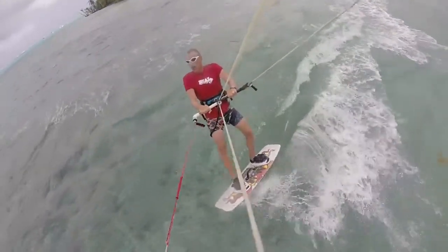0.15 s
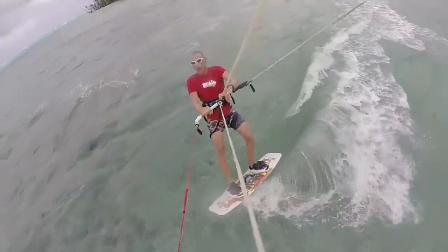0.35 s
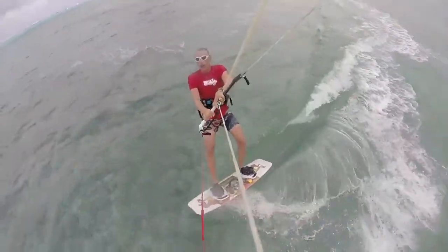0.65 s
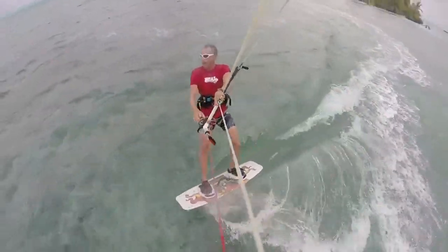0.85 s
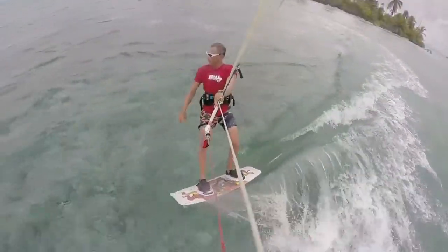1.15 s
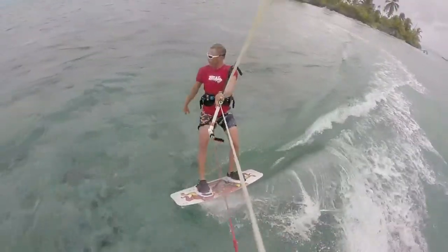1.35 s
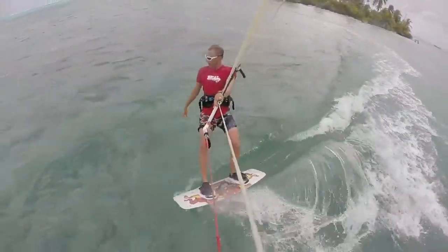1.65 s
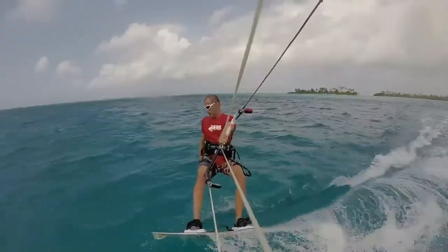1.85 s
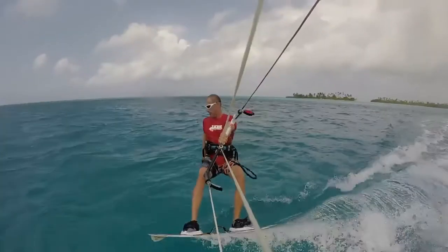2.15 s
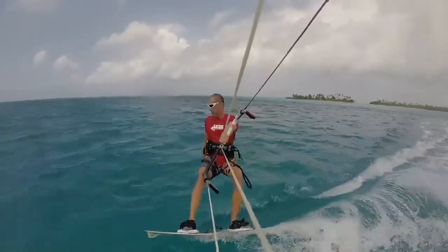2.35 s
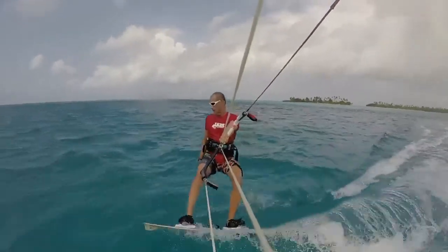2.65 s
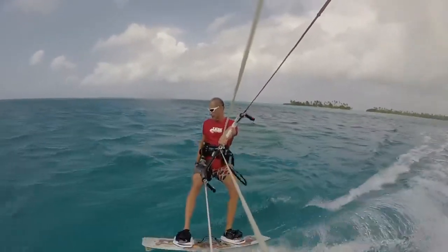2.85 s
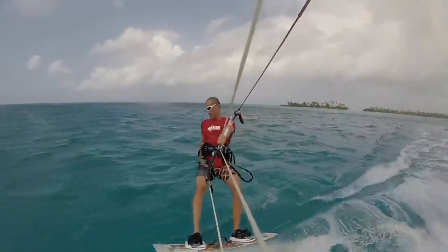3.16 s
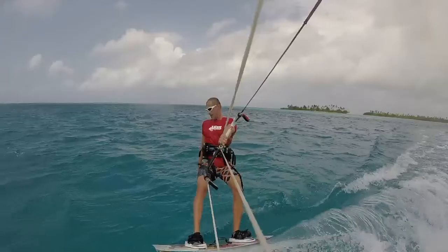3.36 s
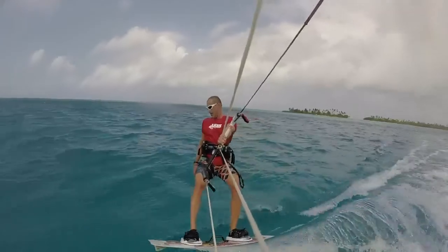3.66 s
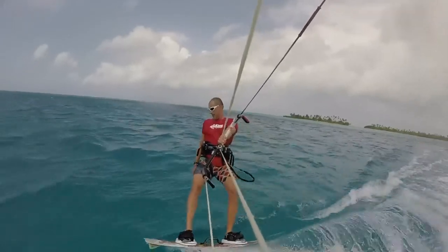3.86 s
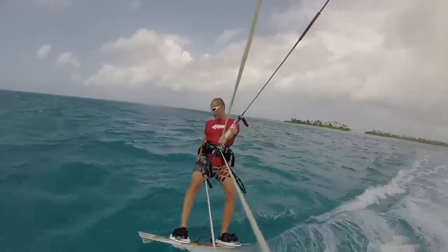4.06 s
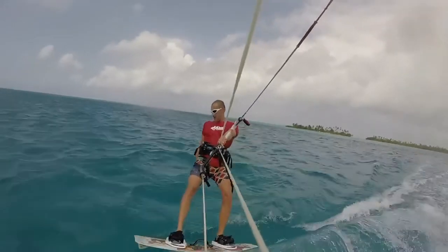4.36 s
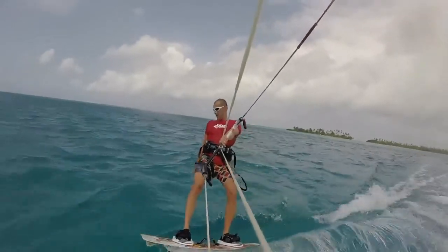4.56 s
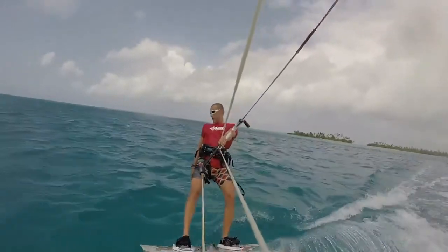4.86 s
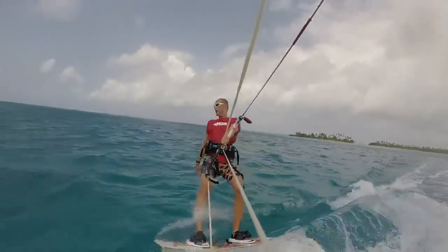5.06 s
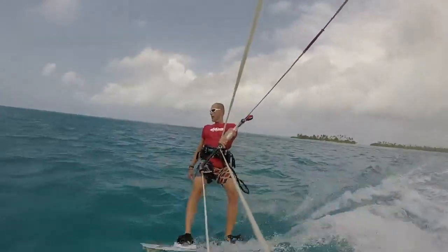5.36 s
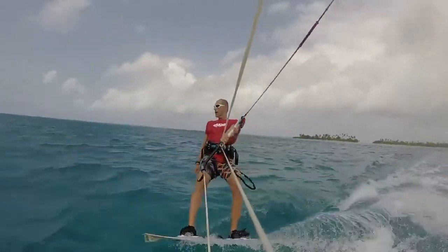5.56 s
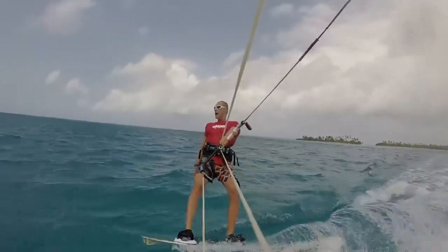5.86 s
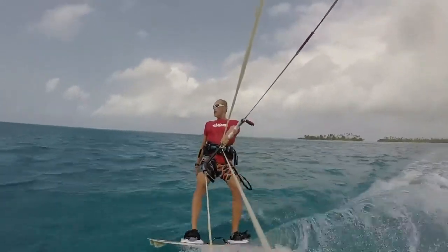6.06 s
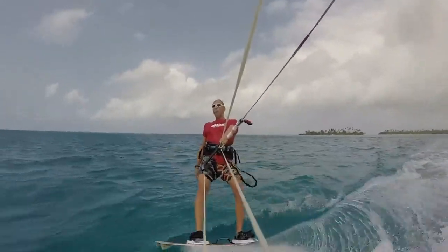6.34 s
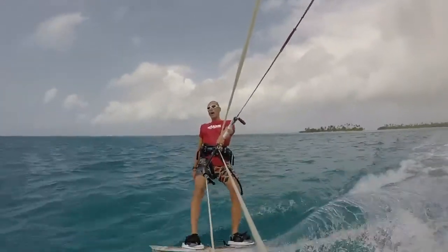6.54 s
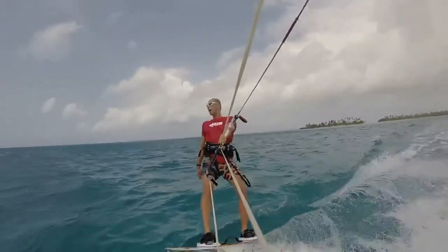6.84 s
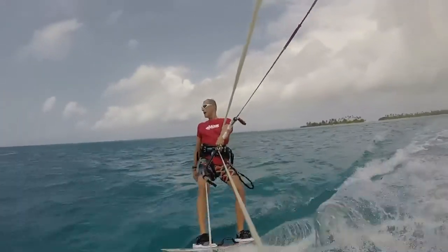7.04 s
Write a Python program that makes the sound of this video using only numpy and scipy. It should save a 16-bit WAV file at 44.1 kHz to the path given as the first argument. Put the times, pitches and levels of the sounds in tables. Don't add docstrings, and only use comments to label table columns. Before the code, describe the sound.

A small camera hanging on kite lines above a rider at sea. Low gusts thud and shudder against its housing while a soft, hollow whistle rises slowly. After under two seconds the scene cuts abruptly to a much louder, higher, fluttering whistle with a thinner one an octave above. Board spray hisses below, and a few water drops tick on the housing.

```python
import sys
import numpy as np
from scipy import signal
from scipy.fft import rfft, irfft
from scipy.io import wavfile
from scipy.ndimage import uniform_filter1d, minimum_filter1d

SR = 44100
rng = np.random.default_rng(int(sys.argv[2]) if len(sys.argv) > 2 else 0)


def volts_from_db(level):
    exponent = np.asarray(level, float) / 20
    return 10 ** exponent


def unload_audio(sound):
    columns = np.transpose(np.atleast_2d(sound))
    steps = np.round(np.clip(columns, -1, 1) * 32767)
    wavfile.write(sys.argv[1], SR, steps.astype(np.int16))


N = 317520


def in_time(rows):
    s, *columns = np.transpose(rows)
    return [np.interp(np.arange(N) / SR, s, c) for c in columns]


def swells(rows):
    t = np.arange(0, N + 40, 40) / SR
    bells = sum(height * np.exp(-((t - s) / half) ** 2) for s, half, height in rows)
    return np.interp(np.arange(N) / SR, t, bells)


def drift(rate):
    r = np.exp(-80 * np.pi * rate / SR)
    draws = rng.standard_normal(N // 40 + 2002)
    slow = signal.lfilter([1], [1, -2 * r, r * r], draws)[2000:]
    return np.interp(np.arange(N) / 40, np.arange(len(slow)), rms_one(slow))


def wander(half_width_hz, order):
    low_pass = signal.butter(order, half_width_hz, fs=SR / 10, output="sos")
    draws = rng.standard_normal((2, N // 10 + 2))
    slow = rms_one(signal.sosfilt(low_pass, draws[0] + 1j * draws[1]))
    return np.interp(np.arange(N) / 10, np.arange(N // 10 + 2), slow)


def rms_one(x):
    return x / np.sqrt(np.mean(np.abs(x) ** 2) + 1e-20)


def colour(x, spectrum, resonances=()):
    hz = np.maximum(np.fft.rfftfreq(N, 1 / SR), 1)
    points = np.array(spectrum)
    shape_db = np.interp(np.log(hz), np.log(points[:, 0]), points[:, 1])
    for centre_hz, width_hz, top_db in resonances:
        shape_db += top_db * np.exp(-(2 * (hz - centre_hz) / width_hz) ** 2)
    return rms_one(irfft(rfft(x) * volts_from_db(shape_db), N))


def patchy_noise(edges_hz, shared_db, own_db, rate):
    bins, together, out = rfft(rng.standard_normal(N)), drift(rate), 0
    hz = np.fft.rfftfreq(N, 1 / SR)
    for low, high in zip(edges_hz, edges_hz[1:]):
        band = irfft(bins * (hz >= low) * (hz < high), N)
        out = out + band * volts_from_db(shared_db * together + own_db * drift(2 * rate))
    return out


def whistle(centre_hz, stretches, spread, follow, waver, flicker_db):
    out = 0
    reach_hz = follow * centre_hz + (1 - follow) * np.min(centre_hz) * 1.1
    for multiple, half_width, level_db in stretches:
        hz = centre_hz + spread * (multiple - 1) * (centre_hz if multiple < 1 else reach_hz)
        turns = np.cumsum(hz * (1 + waver * drift(5.0))) / SR
        envelope = wander(spread * half_width * np.mean(centre_hz), order=3)
        tone = np.real(envelope * np.exp(2j * np.pi * turns))
        out = out + volts_from_db(level_db + flicker_db * drift(6.1)) * tone
    return rms_one(out)


def whistling_lines(wind, lift_stretches, drag, lift_spread, drag_spread, follow):
    # t/s, half length/s, share of speed
    puffs = [(.6, 0.047, -0.018), (1.0, 0.046, 0.022), (1.2, .05, -.04), (1.33, 0.038, 0.028),
             (2.44, 0.041, -0.063), (2.55, 0.033, 0.021), (2.7, 0.09, -0.026), (3.25, 0.045, 0.015),
             (3.93, 0.048, 0.054), (4.13, 0.059, 0.028), (4.33, 0.053, -0.042), (4.9, 0.07, -0.03),
             (5.07, 0.041, 0.028), (5.3, 0.0591, -.033), (5.52, .06, 0.036), (5.71, 0.047, 0.014),
             (5.92, 0.082, -0.047), (7.0, 0.062, -0.035)]
    # multiple of the centre f, half width as share, level/dB
    drag_stretches = [(.93, 0.023, -7), (.98, 0.024, 0), (1.03, 0.018, -0.5), (1.075, 0.034, -9.5),
                      (1.02, 0.14, -7)]
    lift_hz, drag_hz, lift_db = in_time(wind)
    puff = swells(puffs)
    puff_db = 35 * puff
    base_db, db_per_octave, lift_share = drag
    drag_db = base_db + db_per_octave * np.log2(drag_hz / 1800) + puff_db
    drag_db += lift_share * (lift_db - np.mean(lift_db))
    lift_db = lift_db + puff_db
    lift = whistle(lift_hz * (1 + 1.1 * puff), lift_stretches, lift_spread, follow, waver=.007, flicker_db=1.5)
    thin = whistle(drag_hz * (1 + puff), drag_stretches, drag_spread, 0, waver=.012, flicker_db=3.5)
    return volts_from_db(lift_db) * lift + volts_from_db(drag_db - 3.5) * thin, lift_db


def gust_strength():
    # t/s, level/dB
    gusts = [(0.251, 2.5), (0.881, 6), (1.0, -3.5), (1.25, 1), (1.85, 2.5), (2.1, 2), (2.34, 6), (2.6, 5),
             (2.78, 4), (2.97, 6.5), (3.14, 7.5), (3.4, 3), (3.53, -1.5), (3.73, 0), (3.83, 0.5),
             (4.43, -1), (4.55, 5.5), (5.07, 5), (5.22, -3), (5.609, 3), (5.81, 2), (6.01, -3.5),
             (6.11, 8.5), (6.31, 3.5), (6.5, 1.5), (6.7, -1.5), (6.9, -1.5), (7.1, -3), (4.7, 3.5),
             (.72, -3.5)]
    return swells([(s, 0.09, db) for s, db in gusts])


def buffeting(gust_db):
    # f/Hz, level/dB
    buffet_colour = [(20, -2), (40, -8.5), (60, -1.5), (80, -2.5), (110, -0.5), (140, -6.5), (170, -13.5),
                     (230, -39)]
    rumble = patchy_noise([10, 50, 100, 300], shared_db=1.0, own_db=0.5, rate=46.0)
    return volts_from_db(-28 + gust_db) * colour(rumble, buffet_colour)


def air_rush(gust_db, lift_db, rush_colour, rush_db):
    # t/s, half length/s, level/dB
    eddies = [(.2, 0.068, -2), (.7, 0.19, -2.5), (1.3, 0.076, -1.5), (1.8, 0.14, -1), (2.9, 0.13, -1),
              (3.3, 0.061, 0), (3.6, 0.11, 2), (3.9, 0.14, 1.5), (4.7, 0.22, -1), (5.4, 0.1, 2.5),
              (5.6, 0.076, 1), (3.45, .05, 1), (3.75, .05, -0.5), (6.05, 0.1, -2.5), (6.45, 0.078, -2)]
    rush = patchy_noise(np.geomspace(60, 5000, 7), shared_db=0.93, own_db=1.3, rate=2.2)
    gusting_db = 0.11 * (gust_db - np.mean(gust_db)) + 0.25 * (lift_db - np.mean(lift_db))
    return volts_from_db(rush_db + gusting_db + swells(eddies)) * colour(rush, rush_colour)


def spray_hiss(spray_colour, housing):
    # t/s, half length/s, level/dB over the mean hiss
    splashes = [(.62, 0.064, 3), (.97, 0.14, 5.5), (1.27, 0.049, 5), (1.8, 0.078, 5), (2.15, .15, 0.5),
                (2.34, 0.062, 3.5), (2.44, 0.058, -1.5), (2.56, 0.045, 5), (2.8, .04, 1.5),
                (2.97, 0.19, 3.5), (3.24, 0.066, 6.5), (3.53, 0.073, 2.5), (4.02, 0.35, 5.5),
                (4.43, 0.066, 2.5), (4.62, 0.14, 5), (5.1, 0.13, 7), (5.42, 0.13, 3), (5.71, 0.06, 6),
                (6.1, 0.48, 1.5), (6.61, 0.055, 4.5), (6.85, 0.1, 5.5), (7.1, 0.062, 6)]
    # t/s, half length/s, level/dB
    ringing = [
        (2.8, .06, 3),
        (2.95, .03, 0),
        (3.25, .05, 0.5),
        (3.55, 0.048, 2),
        (4.45, .03, 2),
        (4.63, .05, 4),
        (5.2, .04, 5),
        (5.5, .1, -1),
        (6.1, 0.049, 4),
        (6.6, .05, 1),
    ]
    hiss = patchy_noise(np.geomspace(1500, 16000, 6), shared_db=0.4, own_db=1.1, rate=10.4)
    hiss = colour(hiss, spray_colour, housing)
    body = signal.filtfilt(*signal.butter(2, 7500, fs=SR), hiss)
    cavity = signal.filtfilt(*signal.butter(1, [4400, 5000], "band", fs=SR), hiss)
    extra_ring = (volts_from_db(swells(ringing)) - 1) * cavity
    body, hiss = body + extra_ring, hiss + extra_ring
    spray_db = -47 + 0.6248 * np.arange(N) / SR + swells(splashes)
    steadier_db = -.4 * (spray_db - np.mean(spray_db))
    return volts_from_db(spray_db) * (body + volts_from_db(steadier_db) * (hiss - body))


def one_pass(wind, lift_stretches, drag, spreads, rush_colour, rush_db, spray_colour, housing):
    lines, lift_db = whistling_lines(wind, lift_stretches, drag, *spreads)
    gust_db = gust_strength()
    air = air_rush(gust_db, lift_db, rush_colour, rush_db)
    return lines + buffeting(gust_db) + air + spray_hiss(spray_colour, housing)


def shudders():
    # t/s, length/s, start f/Hz, end f/Hz, peak level/dB
    jerks = [(0.078, 0.077, 70.5, 85, -16), (0.125, 0.064, 76.5, 65, -10), (0.205, 0.031, 74.5, 80, -15.5),
             (0.304, 0.07, 66, 102, -16), (0.327, 0.064, 85.5, 105, -13.5), (0.352, 0.05, 1220, 1340, -40),
             (0.364, .04, 1330, 1450, -45), (0.459, 0.025, 278, 284, -29), (0.532, 0.038, 101.5, 89, -13),
             (0.525, 0.03, 188, 200, -26), (0.529, 0.025, 300, 306, -26), (.3, 0.043, 131, 200, -26),
             (0.352, 0.056, 196, 215, -25), (0.584, 0.05, 310, 333, -39), (0.791, 0.056, 244, 282, -33),
             (0.843, 0.052, 200, 242, -39), (0.854, 0.033, 308, 347, -31), (0.789, 0.067, 2970, 3180, -47),
             (0.811, 0.056, 69, 98, -18), (.86, 0.068, 121, 143, -21.5), (.855, .05, 3150, 3080, -47),
             (0.883, 0.046, 90, 82, -26), (0.989, 0.059, 80, 71.9, -21), (1.08, 0.055, 1005, 1030, -33),
             (1.329, .06, 1098, 1130, -36.5), (1.36, 0.081, 1564, 1520, -36),
             (2.121, 0.037, 101, 93.5, -19), (2.345, 0.06, 76.2, 68, -13.5),
             (3.128, 0.098, 111.9, 69.8, -18), (4.354, 0.062, 92.35, 96, -18),
             (5.545, 0.1, 75.3, 69, -15.5)]
    # delay t/s, length/s, start f/Hz, end f/Hz, peak level/dB
    overtones = [
        (.001, .04, 170, 225, -18),
        (.013, .086, 272.5, 286, -23.5),
        (.023, .11, 393, 408, -27.5),
        (.033, .053, 495, 539, -32.5),
    ]
    twang_s = .332
    out = np.zeros(N)
    rattle = 1 + 0.4 * wander(60.0, order=2).real
    twangs = [(twang_s + delay, *rest) for delay, *rest in overtones]
    for s, length, start_hz, end_hz, peak_db in jerks + twangs:
        u = np.linspace(0, 1, int(length * SR))
        swing = np.sin(2 * np.pi * np.cumsum(start_hz + (end_hz - start_hz) * u) / SR)
        out[int(s * SR):][:len(u)] -= volts_from_db(peak_db) * np.sin(np.pi * u ** 0.7) * swing
    return out * rattle


def bursts(lines):
    # t/s, peak level/dB, f/Hz
    whistle_bursts = [(1.768, -3, 1019), (1.88, -10, 1130), (2.088, -6, 1039), (2.375, -10, 960),
                      (2.469, -9, 1025), (2.525, -13, 1160), (2.729, -6, 1000), (2.796, -2, 1007),
                      (2.973, -1, 1070), (3.042, -1.5, 1040), (3.118, -3.5, 1100), (3.188, -5, 1030),
                      (3.467, -3, 940), (3.555, -3, 1040), (3.615, -1, 1017), (3.853, -5, 990),
                      (3.918, -2.5, 1050), (3.995, -5, 1060), (4.066, -8, 909.4), (4.142, -5.5, 1060),
                      (4.219, -3.5, 860), (4.294, -5.5, 929.7), (4.335, -10, 990), (4.486, -5, 950),
                      (4.592, -9, 1050), (4.713, -4.5, 860), (4.783, -7, 845), (4.959, -5.5, 810),
                      (5.057, -3.5, 910), (5.177, -4.5, 840), (5.233, -6, 820), (5.451, -9, 990),
                      (5.66, -4, 803), (5.717, -11, 915), (5.83, -10, 860), (5.973, -10.5, 808),
                      (6.069, -9, 900), (6.157, -6, 865), (6.282, -5, 820), (6.535, -7, 897),
                      (6.623, -7.5, 869.9), (6.738, -6, 800), (6.812, -16, 820), (7.091, -8.5, 845),
                      (.118, -18, 700), (.179, -17, 725), (.343, -15.5, 745), (.787, -16, 820),
                      (1.527, -12.5, 788), (1.706, -11, 850), (1.743, -12.5, 800)]
    rise_s, attack_s, release_s = 0.00301, .004, 0.0054
    hush_lead_s, hush_half_s, hush_share = 0.0022, 0.0079, .7
    out, t = lines.copy(), np.arange(-600, 600) / SR
    bell = np.exp(-(t / np.where(t < 0, attack_s, release_s)) ** 2)
    whistle_band = signal.butter(2, [600, 1500], "band", fs=SR, output="sos")
    scattered = signal.sosfiltfilt(whistle_band, lines)
    hush = hush_share * np.exp(-((t + hush_lead_s) / hush_half_s) ** 2)
    for (s, peak_db, hz), turn in zip(whistle_bursts, rng.random((len(whistle_bursts), 1))):
        middle = int((s + rise_s) * SR)
        at = slice(middle - 600, middle + 600)
        burst = volts_from_db(peak_db - 4) * bell * np.sin(2 * np.pi * (hz * t + turn))
        out[at] += burst - hush * scattered[at]
    return out


def drops():
    # t/s, peak level/dB, f/Hz, decay/s
    hits = [(.8764, -30, 5400, 0.0027), (1.5638, -37, 5733, .003), (1.6891, -30, 5500, 0.0033),
            (2.835, -36, 4700, .003), (4.951, -36, 3600, .002), (4.9866, -27, 5700, .0025),
            (4.995, -33, 7000, .002), (5.05, -31, 5500, .003), (5.09, -38, 6000, 0.0028),
            (5.122, -44, 6000, .004), (5.152, -32, 6000, .002), (5.198, -34, 4600, 0.0022),
            (5.03, -41, 7000, 0.098), (5.11, -39.5, 7510, 0.12), (5.146, -25, 5406, 0.0055),
            (5.185, -18, 7160, 0.0012), (5.188, -35, 9500, 0.0017), (5.208, -18.5, 5497, 0.0011),
            (5.229, -26, 4598, 0.0018), (5.2826, -31, 4810, 0.0032), (6.5276, -28, 4700, 0.0039),
            (6.755, -26.5, 4800, .003)]
    out, t = np.zeros(N), np.arange(9000) / SR
    noises = rng.standard_normal((len(hits), 9000))
    for (s, peak_db, hz, decay), noise in zip(hits, noises):
        band = signal.butter(2, [0.75 * hz, 1.11 * hz], "band", fs=SR, output="sos")
        bright = rms_one(signal.sosfilt(band, noise))
        swell = np.minimum(t / (0.25 * decay), 1) * np.exp(-t / decay)
        out[int(s * SR):][:9000] += volts_from_db(peak_db - 6.0) * bright * swell
    return out


def locked_strands():
    # t/s, length/s, start f/Hz, end f/Hz, level/dB
    strands = [(1.797, 0.12, 1950, 2030, -35), (2.298, 0.15, 2178, 2030, -32),
               (2.441, 0.099, 2013, 2180, -35), (3.498, 0.2, 2100, 2020, -29.5),
               (5.033, 0.078, 1900, 1994, -35), (5.701, 0.14, 1905, 1900, -37),
               (6.401, 0.17, 1790, 1771, -34.5), (6.578, 0.066, 1897, 1924, -34),
               (7.03, 0.12, 1883, 1859, -37), (2.5, 0.082, 2120, 2375, -33.5),
               (3.899, 0.12, 2060, 2162, -37), (4.217, 0.069, 2080, 2023, -31.5),
               (3.702, 0.13, 2034, 1979, -32), (4.334, 0.096, 1729, 1724, -31),
               (4.601, 0.16, 1959, 1883, -35), (2.6, 0.33, 1915, 2020, -35),
               (2.778, 0.081, 762, 750, -29.5), (3.854, 0.085, 1898, 2035, -32),
               (3.937, 0.18, 1998, 1848, -25.5), (4.079, 0.093, 1960, 2102, -30),
               (4.151, 0.13, 2080, 1922, -39), (4.24, 0.16, 1820, 1730, -32.5),
               (4.37, 0.1004, 1797, 1950, -31), (4.46, 0.13, 1940, 1938, -31),
               (5.083, .14, 1774, 1760, -32), (5.262, 0.14, 1758, 1724, -28), (5.44, 0.15, 1770, 1930, -32),
               (5.42, 0.093, 1930, 2062, -34), (5.475, 0.078, 2040, 1956, -43),
               (5.82, 0.099, 1780, 1736, -35), (5.929, 0.12, 1707, 1728, -29),
               (5.87, 0.13, 1557, 1477, -42), (6.007, 0.12, 1748, 1783, -38),
               (7.02, .16, 1720, 1700, -32.5), (6.6, .2, 1700, 1760, -37), (6.85, 0.17, 1702, 1722, -38),
               (6.299, 0.207, 1880, 1910, -39)]
    # t/s, length/s, start f/Hz, end f/Hz, level/dB
    cores = [(1.77, .2, 1040, 1062, -20.5), (1.97, 0.246, 1070, 1010, -24), (2.24, .12, 1200, 1280, -27),
             (2.53, .1, 1150, 1235, -25), (2.6, 0.225, 1000, 970, -21.5), (2.88, 0.212, 1030, 997.4, -23),
             (3.14, 0.1617, 990, 1073, -27), (3.3, .15, 970, 997, -23), (3.5, .15, 990, 1003, -23),
             (3.72, .23, 960, 1050, -23), (3.98, .17, 1010, 959, -23), (4.17, .16, 890, 861, -23.5),
             (4.45, 0.151, 900, 969, -25), (4.7, 0.286, 830, 849, -25.5), (5.0, .12, 882, 909, -24),
             (6.5, .18, 840, 892, -26), (5.1, 0.1961, 870, 835, -25.5), (5.42, 0.184, 950, 977, -30),
             (5.6, .12, 830, 798, -27), (5.82, 0.11, 870, 853, -26.5), (6.06, .14, 850, 830, -22.5),
             (6.21, .1, 890, 830, -25), (6.34, .16, 830, 831.4, -25.5), (6.7, 0.14, 820, 828, -32)]
    # t/s, f/Hz, level/dB
    thin_line = [(1.76, 2099, -22), (1.88, 2190, -31), (1.99, 2200, -30), (2.04, 2122, -24.5),
                 (2.1, 2190, -27), (2.19, 2033, -23), (2.33, 2098, -29), (2.43, 1870, -25.5),
                 (2.49, 1950, -27), (2.57, 2107, -31), (2.7, 2100, -33), (2.92, 2135, -36),
                 (3.08, 2100, -43), (3.18, 2020, -28), (3.28, 2115, -26), (3.36, 2010, -27.5),
                 (3.42, 2030, -30), (3.49, 1990, -31), (3.56, 1930, -28), (3.66, 1905, -28.5),
                 (3.84, 1894, -33)]
    out = np.zeros(N)
    unrest = wander(40.0, order=2)
    rough, firm = 1 + .6 * unrest, 1 + .3 * unrest
    loose = 1 + .9 * wander(45.0, order=2)
    tremble = 1 + .004 * drift(18.0)
    for s, length, start_hz, end_hz, level_db in strands + cores:
        u = np.linspace(0, 1, int(length * SR))
        at = slice(int(s * SR), int(s * SR) + len(u))
        turns = np.cumsum((start_hz + (end_hz - start_hz) * u) * tremble[at]) / SR
        texture = rough if start_hz > 1400 else loose
        tone = np.real(texture[at] * np.exp(2j * np.pi * turns))
        out[at] += volts_from_db(level_db + 2.0) * np.abs(np.sin(np.pi * u)) ** 0.48 * tone
    hz, level_db = in_time(thin_line)
    turns = np.cumsum(hz * tremble) / SR
    still_locked = np.clip((thin_line[-1][0] - np.arange(N) / SR) / 0.037, 0, 1)
    return out + still_locked * volts_from_db(level_db + 4.0) * np.real(firm * np.exp(2j * np.pi * turns))


def scene():
    # t/s, lift f/Hz, drag f/Hz, lift level/dB
    first_wind = [
        (0.0, 686, 1360, -34.5),
        (.12, 712, 1424, -27),
        (.3, 735, 1440, -31.5),
        (.5, 759, 1490, -29.5),
        (.75, 801.6, 1533, -28),
        (.9, 807.2, 1537, -26),
        (1.15, 816.5, 1599, -24.5),
        (1.4, 824, 1610, -25),
        (1.62, 848, 1625, -26.5),
        (1.75, 835, 1632, -21.5),
    ]
    second_wind = [(1.75, 1086, 2142, -12), (2.05, 1083, 2130, -16), (2.17, 1056, 2064, -17.5),
                   (2.55, 1068, 2040, -17), (2.8, 1016, 2035, -16.5), (3.05, 1026, 2053, -16),
                   (3.45, 998, 2038, -15.5), (3.7, 998, 1950, -19.5), (3.85, 990.6, 1933, -18),
                   (4.1, 978, 1962, -18.5), (4.23, 930, 1948, -13.5), (4.38, 937, 1928, -18.5),
                   (4.55, 940.6, 1900, -18), (4.7, 915, 1873, -17.5), (4.92, 896.6, 1830, -19.5),
                   (5.06, 932, 1850, -20), (5.15, 887.6, 1813, -20.5), (5.4, 927.4, 1828, -20),
                   (5.65, 884, 1830, -20), (5.95, 883, 1800, -19.5), (6.2, 890.6, 1835, -20.5),
                   (6.5, 868.8, 1830, -20), (6.8, 879, 1830, -21), (7.2, 902, 1804, -22)]
    # multiple of the centre f, half width as share, level/dB
    first_lift = [(.86, 0.054, -1.5), (0.949, 0.052, 1.5), (1.04, 0.066, 0), (1.13, 0.062, -6),
                  (1.24, 0.078, -16)]
    second_lift = [(.865, 0.044, -5.5), (.95, 0.05, 0), (1.05, 0.059, -1.5), (1.16, 0.05, -6),
                   (1.29, 0.073, -13)]
    # f/Hz, level/dB
    first_rush = [(100, -32), (170, -8), (300, -5.5), (550, -8.5), (1100, -10), (1700, -16.5), (2300, -10),
                  (2800, -23), (4000, -36)]
    second_rush = [(100, -21), (170, -3), (300, -2.5), (600, -7), (1000, -9.5), (1600, -5.5), (2300, -14),
                   (3000, -30.5), (4000, -33.5)]
    first_spray = [(1800, -26), (2700, -13), (4000, -5.5), (6500, -9), (7600, -15.5), (11000, -23),
                   (13500, -24), (14300, -26), (15200, -35)]
    second_spray = [(1300, -24), (2200, -3), (2800, -3.5), (3200, -10), (4100, -10.5), (5300, -12.5),
                    (6800, -15), (7500, -21), (9700, -23), (11400, -26), (13500, -25.5), (14100, -33),
                    (15000, -42)]
    # f/Hz, width/Hz, level/dB
    first_housing = [(3100, 220, 1.2), (4540, 420, 6.6), (5560, 1360, 8.2), (9400, 2200, 7.8)]
    second_housing = [(3410, 170, 2.2), (4700, 620, 7.8), (5780, 510, 2.2), (8820, 1540, 4.9),
                      (10500, 550, 5.3), (12200, 500, 3), (13100, 700, 2.5)]
    # dB at 1800 Hz, dB per octave of speed, share of the lift whistle's swings
    first_drag, second_drag = (-20, 113, 0.37), (-28, 21.3, 0.66)
    first_spreads, second_spreads = (1.03, 1.9, 2.5), (1.04, 1.12, 0.05)
    change_s, fade_in_s = 1.75, .014
    t = np.arange(N) / SR
    first = one_pass(first_wind, first_lift, first_drag, first_spreads,
                     first_rush, -35, first_spray, first_housing)
    second = one_pass(second_wind, second_lift, second_drag, second_spreads,
                      second_rush, -30.5, second_spray, second_housing)
    second = second + locked_strands()
    fade_in = (t >= change_s) * np.clip(0.11 + (t - change_s) / fade_in_s, 0, 1)
    passes = bursts(first * (t < change_s) + second * fade_in)
    tick = volts_from_db(-33) * (np.arange(N) == int(change_s * SR))
    return (passes + tick + shudders() + drops())[None]


def top_cut(x):
    return signal.sosfilt(signal.butter(12, 15180, fs=SR, output="sos"), x)


def record(dry):
    room_left = minimum_filter1d(np.minimum(1, .86 / (np.abs(dry) + 1e-9)), size=301)
    gain = uniform_filter1d(uniform_filter1d(room_left, size=151), size=151)
    return top_cut(dry * gain)


dry = scene()
out = record(dry)
unload_audio(out)
```